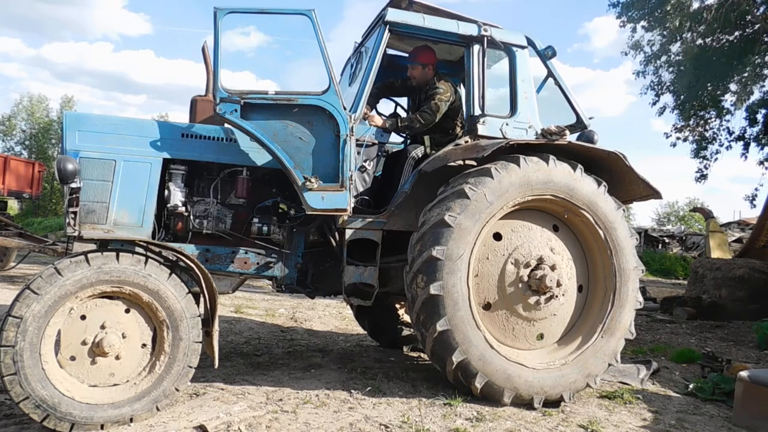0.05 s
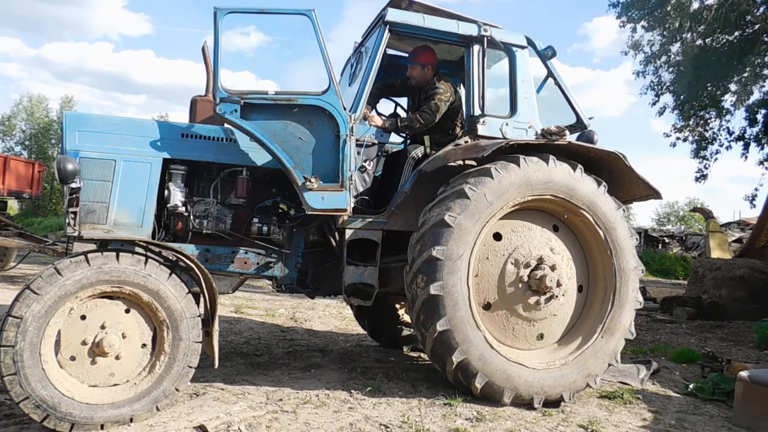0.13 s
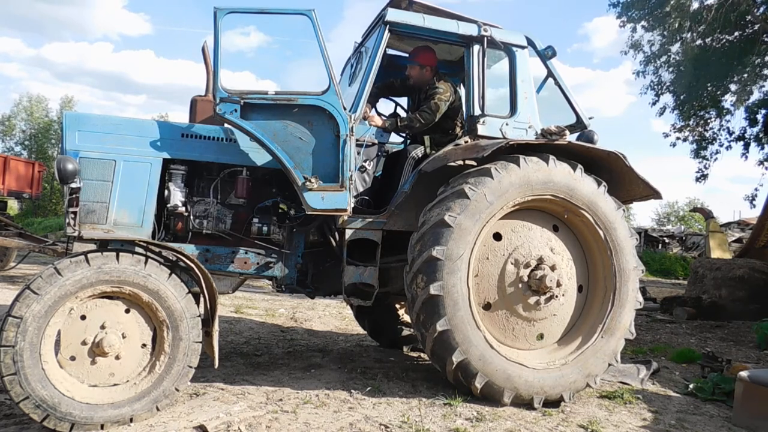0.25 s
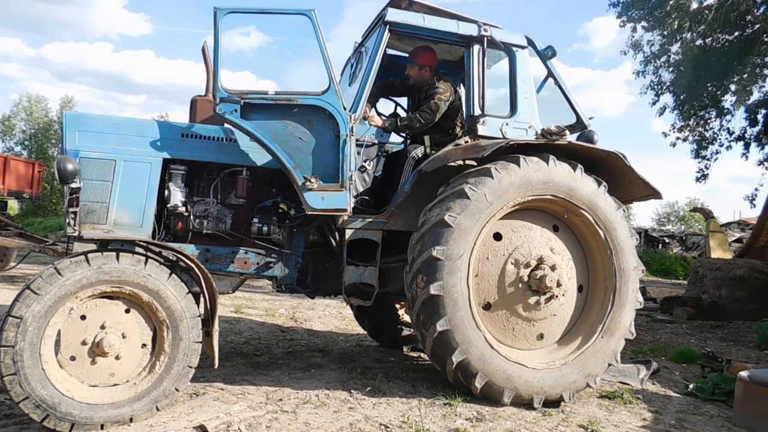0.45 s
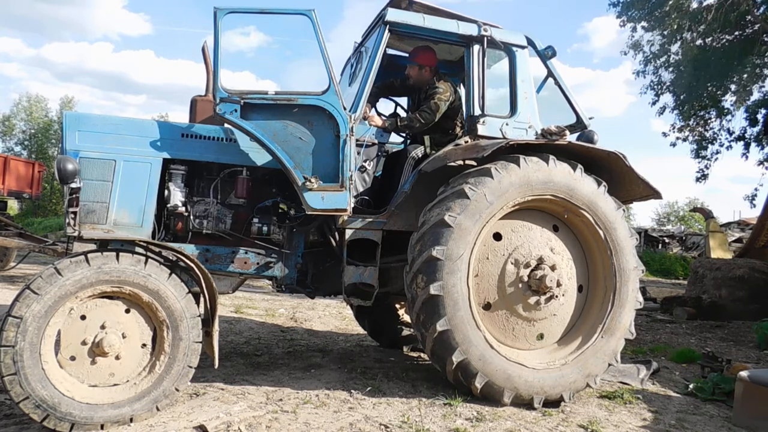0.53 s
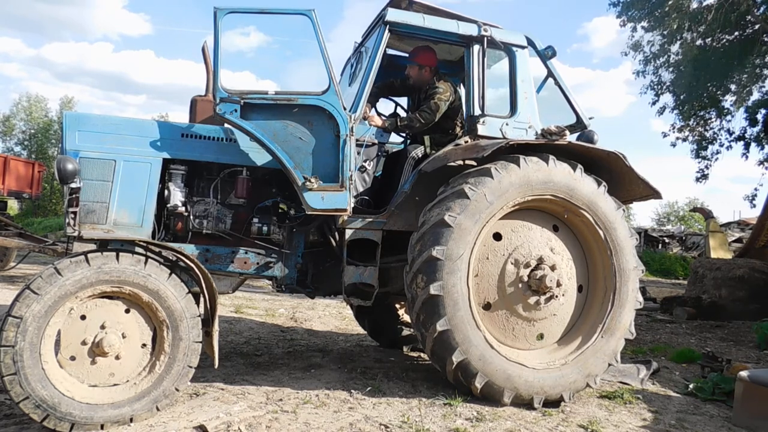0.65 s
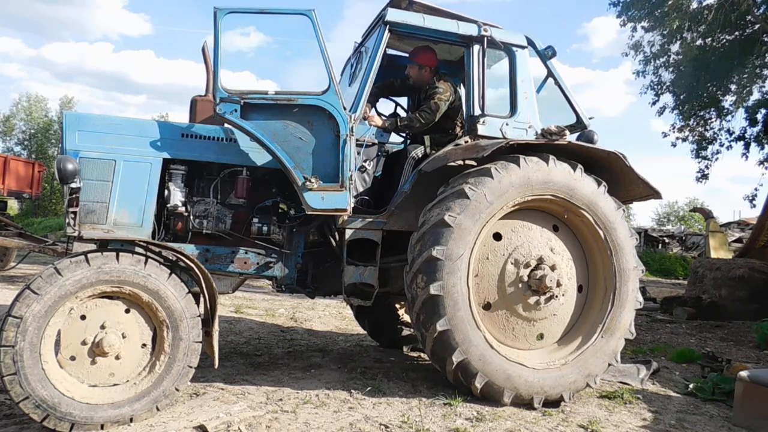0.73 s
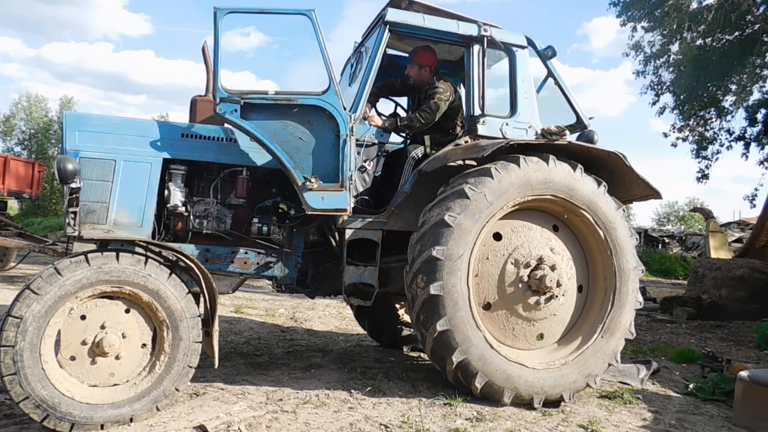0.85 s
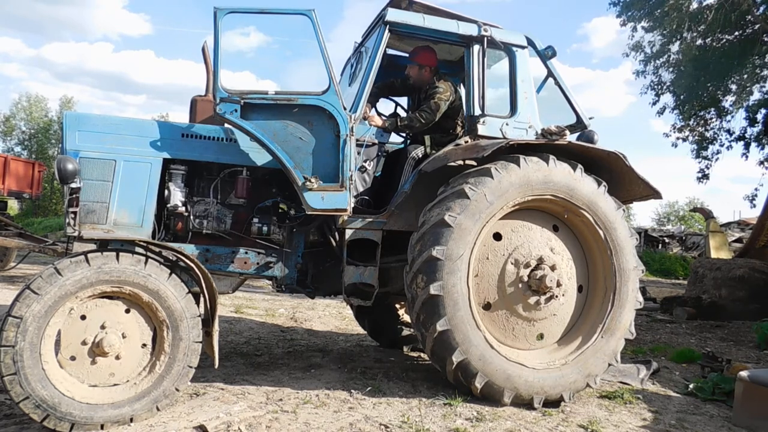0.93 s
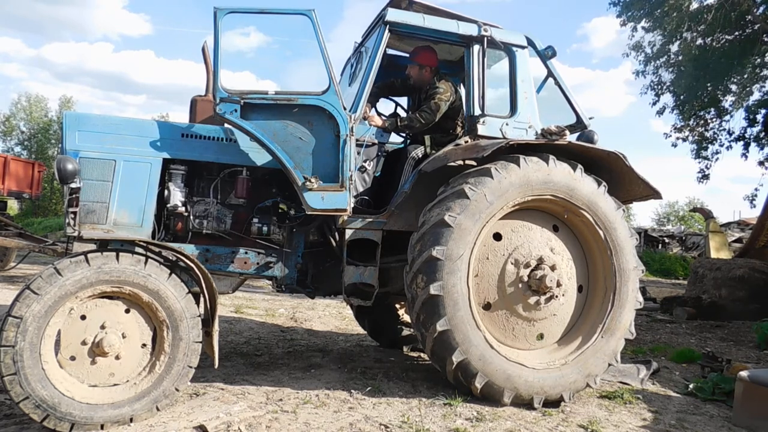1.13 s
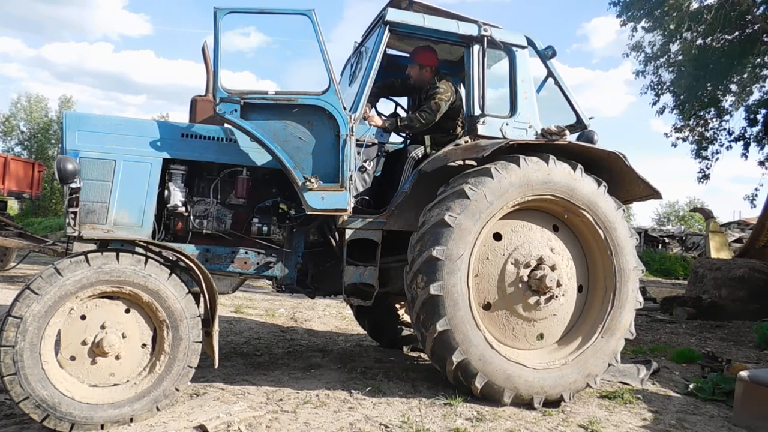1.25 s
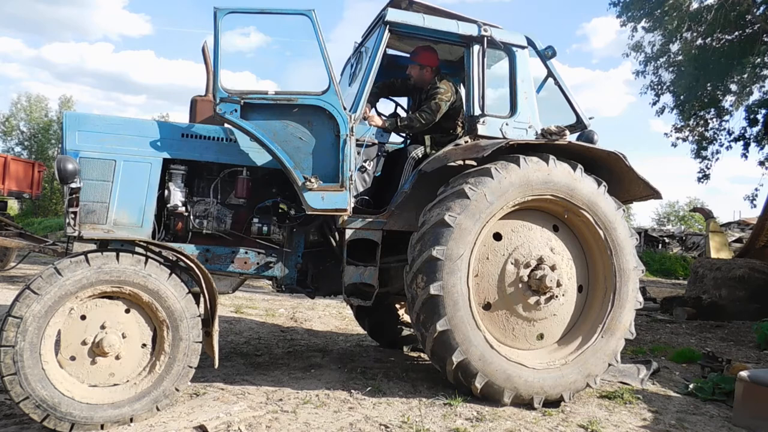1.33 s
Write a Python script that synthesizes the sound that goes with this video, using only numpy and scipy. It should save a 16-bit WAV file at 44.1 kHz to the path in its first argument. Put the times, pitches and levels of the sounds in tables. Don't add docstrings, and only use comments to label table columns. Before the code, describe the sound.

A tractor starter motor cranks in an open yard, heard close in stereo. Quiet air and far traffic until a hard metallic clack at 0.21 s. Gritty gear chatter and whine rise to 0.44 s, sag to a slow grind near 0.65 s with a soft low thud, surge faster to 0.9 s, then slow and cut off around 1.08 s. A faint tick follows at 1.17 s, with short scattered echoes.

```python
import sys
import numpy as np
from scipy import signal
from scipy.fft import rfft, irfft
from scipy.io import wavfile
from scipy.ndimage import uniform_filter1d

SR = 44100
rng = np.random.default_rng(int(sys.argv[2]) if len(sys.argv) > 2 else 0)


def to_wav(sig):
    pcm = np.clip(np.atleast_2d(sig), -1, 1) * 32767
    pcm = np.round(pcm).astype(np.int16)
    wavfile.write(sys.argv[1], SR, pcm.T)


def undo_db(level):
    steps = np.asarray(level, float) / 20
    return 10 ** steps


N = 61739
TIME = np.arange(N) / SR
SIZE = 2 ** 17
HZ = np.arange(SIZE // 2 + 1) * SR / SIZE

# frequency in Hz, level difference in dB.
LEAN = [(60, 0), (300, .2), (700, .6), (1290, 1.5), (2380, -1.3), (4400, 2.5), (8120, 5), (15000, 9)]


def rms_one(x):
    return x / np.sqrt(np.mean(x ** 2) + 1e-20)


def in_time(rows):
    return np.interp(TIME, *np.transpose(rows))


def at_hz(points, hz):
    f, v = np.transpose(points)
    return np.interp(np.log(hz + 1), np.log(f + 1), v)


def colour(x, db):
    cepstrum = irfft(db * np.log(10) / 20)
    cepstrum[1:SIZE // 2] *= 2
    cepstrum[SIZE // 2 + 1:] = 0
    return irfft(rfft(x, SIZE) * np.exp(rfft(cepstrum)))[..., :N]


def drift(rate_hz):
    r = np.exp(-2 * np.pi * rate_hz / SR)
    return rms_one(signal.lfilter([1], [1, -2 * r, r * r], rng.standard_normal(N + SR))[SR:])


def pulses(phase, jitter, spread_db):
    count = int(phase[-1])
    late, loud = rng.standard_normal((2, count))
    at = np.interp(np.arange(count) + .5 + jitter * late, phase, np.arange(N - 0.))
    strength = undo_db(spread_db * loud)
    out, i = np.zeros(N + 1), at.astype(int)
    np.add.at(out, i, strength * (1 - at + i))
    np.add.at(out, i + 1, strength * (at - i))
    return out[:N]


def tooth_blows(phase, speed):
    clicks = pulses(phase, jitter=.02, spread_db=1.7)
    band = signal.butter(2, [500, 2000], "band", fs=SR)
    return signal.lfilter(*band, clicks) * np.sqrt(SR / speed)


def armature_whine(phase, brisk):
    whine_orders = (4, 8, 12, 16, 20, 24, 32, 36, 40, 1)
    whine_levels_db = [-4, 2, -2, 0, -2, -3, -6, -4, -5, -3]
    flutter_db, flutter_hz, fade_order = 3.5, 52, 9
    whine = 0
    for order, db in zip(whine_orders, whine_levels_db):
        level = brisk ** (order / fade_order) * undo_db(db + flutter_db * drift(flutter_hz))
        whine = whine + level * np.sin(2 * np.pi * (order * phase + rng.random()))
    return whine


def gear_grit(phase):
    depth = .35
    hiss = signal.lfilter(*signal.butter(1, 450, "high", fs=SR), rng.standard_normal(N))
    since_blow = (phase + .5) % 1
    return hiss * (1 - depth + 2 * depth * np.exp(-3 * since_blow))


def backlash():
    # slap time in seconds, change in force in dB.
    gear_slaps = [(0.252, 11), (0.273, 4.5), (0.285, 4.5), (0.295, 4), (0.318, 6.5), (0.341, 3),
                  (0.366, -2), (.74, -0.5), (0.769, -0.5), (0.856, 2.5), (1.034, 4.5), (1.047, 0),
                  (1.063, -10)]
    decay_s = 0.0059
    lift_db = sum(db * (TIME >= s) * np.exp(-np.abs(TIME - s) / decay_s) for s, db in gear_slaps)
    return undo_db(lift_db)


def casing(force, brisk):
    # low edge in Hz, high edge in Hz, loss when crawling in dB.
    crawl_dulling = [(157, 1690, 1.2), (1702, 2870, 7.5), (3888, 6560, 14), (8100, 12000, 21.5)]
    # frequency in Hz, level per Hz in dB.
    casing_colour = [(88, -124), (150, -35), (226, -30.5), (354, -20), (854, -15), (1140, -5.5),
                     (3550, -14), (6020, -14.5), (16000, -31.5)]
    # centre in Hz, width in Hz, height over the broad colour in dB.
    casing_rings = [(236.3, 26, 15), (504, 13.3, 9), (725, 160, 8.5), (935, 290, 3.5), (1236, 133, 6),
                    (1866, 170, 13), (2146, 194, 2.5), (2868, 20.5, 12), (3056, 110, -8), (4078, 210, 7.5),
                    (4650, 200, 10), (5585, 57, 6), (6030, 230, 10), (9970, 2460, 11.5)]
    wobble_db = 1.3
    wobble, out = drift(35), 0
    for low, high, db in crawl_dulling:
        gain = undo_db(-db * (1.5 - brisk) + wobble_db * (0.27 * wobble + .5 * drift(43)))
        band = signal.butter(2, [low, high], "band", fs=SR, output="sos")
        out = out + signal.sosfilt(band, force * gain)
    shape = at_hz(casing_colour, HZ)
    for hz, width_hz, db in casing_rings:
        shape = shape + db / (1 + ((HZ - hz) / (width_hz / 2)) ** 2)
    shape = shape - 80 * np.log10(1 + (120 / (HZ + 1)) ** 2)
    return colour(out, shape - 10 * np.log10(np.mean(undo_db(2 * shape))))


def starter():
    # time in seconds, teeth per second.
    tooth_speed = [(.22, 73), (.26, 111.4), (.3, 161), (.33, 180), (.37, 222), (.44, 242), (.485, 223),
                   (.525, 201), (.57, 125), (.65, 83.3), (.71, 115), (.76, 169.5), (.82, 254), (.86, 274),
                   (.905, 282), (.945, 263), (.985, 225), (1.05, 93.5)]
    # time in seconds, level in dB.
    tooth_load = [(.218, -24), (.245, -26.5), (.27, -26.5), (.36, -21.5), (.49, -26.5), (.55, -21.5),
                  (.6, -23.5), (.66, -29), (.715, -25.5), (.75, -23.5), (.8, -24), (.92, -23), (.96, -21.5),
                  (1.068, -26), (1.082, -32.5), (1.13, -46), (1.33, -48), (1.4, -31)]
    engage_s, stop_s, inertia_s = .214, 1.2, .03
    tooth_db, whine_db, grit_db, crawl_grit_db = 2, -7, 3.5, 1
    speed = uniform_filter1d(in_time(tooth_speed), size=int(inertia_s * SR))
    phase = np.cumsum(speed) / SR
    brisk = 1 - np.exp(-(speed / 137.2) ** 3.23)

    teeth = undo_db(tooth_db) * 2 * np.sqrt(brisk) * tooth_blows(phase, speed)
    whine = undo_db(whine_db) * armature_whine(phase, brisk)
    grit = undo_db(grit_db + crawl_grit_db * (2.5 - brisk)) * gear_grit(phase)
    force = (teeth + whine) * (TIME < stop_s) + grit
    force = force * backlash() * undo_db(in_time(tooth_load)) * (TIME > engage_s)
    return casing(force, brisk)


def knocks():
    # time in seconds, peak in dB, decay by 60 dB in seconds, brightness above 4 kHz in dB.
    metal_knocks = [
        (0.2123, -30.5, 0.034, 5),
        (0.2157, -8.5, 0.021, 6.5),
        (.229, -37, .02, -6),
        (.34, -18.5, 0.041, 5),
        (1.1741, -35, 0.048, 6),
        (1.182, -54, 0.041, 11),
    ]
    # frequency in Hz, level in dB.
    clack_colour = [(150, -55), (600, -29), (1200, 0.5), (2200, 10), (4000, 3), (6500, -14), (11000, -15.5),
                    (16000, -30)]
    top_decay_share = 0.61
    low, high = np.zeros(N), np.zeros(N)
    noise = rng.standard_normal(N)
    for s, db, t60, bright_db in metal_knocks:
        fall_db = 60 * np.maximum(TIME - s, 0) / t60
        burst = noise * (TIME >= s)
        low = low + burst * undo_db(db - fall_db)
        high = high + burst * undo_db(db + bright_db - fall_db / top_decay_share)
    low = signal.sosfilt(signal.butter(2, 4000, "low", fs=SR, output="sos"), low)
    high = signal.sosfilt(signal.butter(2, 4000, "high", fs=SR, output="sos"), high)
    return colour(low + high, at_hz(clack_colour, HZ) + 6)


def rocking():
    # time in seconds, level in dB.
    block_rocks = [
        (.59, -48),
        (0.681, -52),
        (1.049, -47),
    ]
    # frequency in Hz, level in dB, decay by 60 dB in seconds.
    frame_modes = [(29.6, -3.5, 0.48), (129.5, -11, 0.16), (229, 1, 0.16), (350, 2.5, 0.11),
                   (490, 3.5, 0.084), (838, 5, 0.18)]
    rise_s, out = .03, 0
    shove = sum(undo_db(db) * np.exp(-.5 * ((TIME - s) / rise_s) ** 2) for s, db in block_rocks)
    for hz, db, t60 in frame_modes:
        r, w = undo_db(-60 / (t60 * SR)), 2 * np.pi * hz / SR
        push = shove * rng.standard_normal(N)
        ring = signal.lfilter([np.sin(w) * np.sqrt(1 - r) * 2], [1, -2 * r * np.cos(w), r * r], push)
        out = out + undo_db(db) * ring
    return out


def yard():
    # frequency in Hz, level per Hz in dB.
    yard_colour = [(15, -29), (25, -5.5), (59, -11), (285, -11), (936, -2.5), (1940, -12.5), (2410, -16.5),
                   (2610, -15), (16000, -42.5)]
    # frequency in Hz, likeness of the two sides from -1 to 1.
    yard_alike = [(60, 0.85), (240, 0.93), (950, 0.83), (3770, -0.38), (15000, -0.05)]
    alike = np.clip(at_hz(yard_alike, HZ), -.95, .95)

    def air(sign):
        noise = rng.standard_normal(N) * undo_db(drift(6))
        return colour(noise, at_hz(yard_colour, HZ) + 10 * np.log10(1 + sign * alike))

    mid, side = air(1), air(-1)
    return undo_db(-45) * rms_one(np.array([mid + side, mid - side]))


def scattered_echo(side):
    # frequency in Hz, echo level in dB.
    scatter_colour = [(100, -21), (600, -15), (2000, -10), (8000, -6), (15000, 0)]
    t60, length = .12, SR // 4
    tail = rng.standard_normal((2, length)) * undo_db(-60 * np.arange(length) / SR / t60)
    tail = tail / np.sqrt(np.sum(tail[0] ** 2))
    return rfft(tail, SIZE) * undo_db(at_hz(scatter_colour, HZ) + side * at_hz(LEAN, HZ))


def scene():
    # frequency in Hz, lead in radians.
    port_lead = [(20, 0), (2240, .1), (3270, .9), (5500, .95), (7150, 1.3), (10900, 2.0), (13600, .8),
                 (16100, .5)]
    tractor = rfft(starter() + knocks() + rocking(), SIZE)
    side = np.array([[.5], [-.5]])
    direct = undo_db(side * at_hz(LEAN, HZ)) * np.exp(1j * side * at_hz(port_lead, HZ))
    return irfft(tractor * (direct + scattered_echo(side)))[:, :N] + yard()


def top_cut(x):
    return signal.sosfilt(signal.butter(12, 16530, fs=SR, output="sos"), x)


def record(dry):
    low_pass = signal.cheby2(12, 60, 16300, fs=SR, output="sos")
    return top_cut(signal.sosfilt(low_pass, dry))


dry = scene()
out = record(dry)
to_wav(out)
```